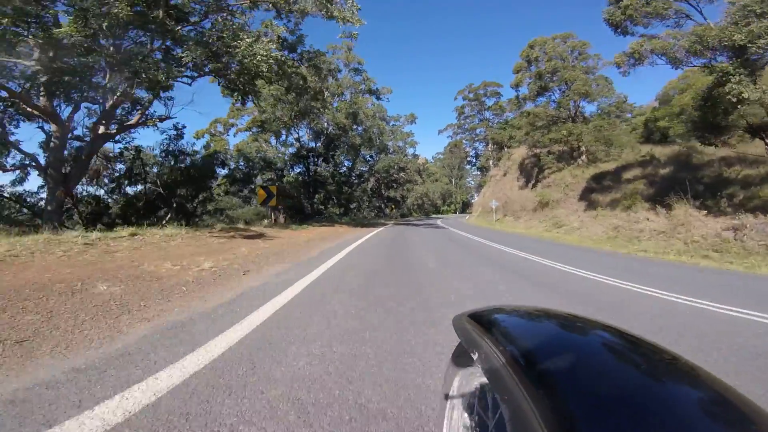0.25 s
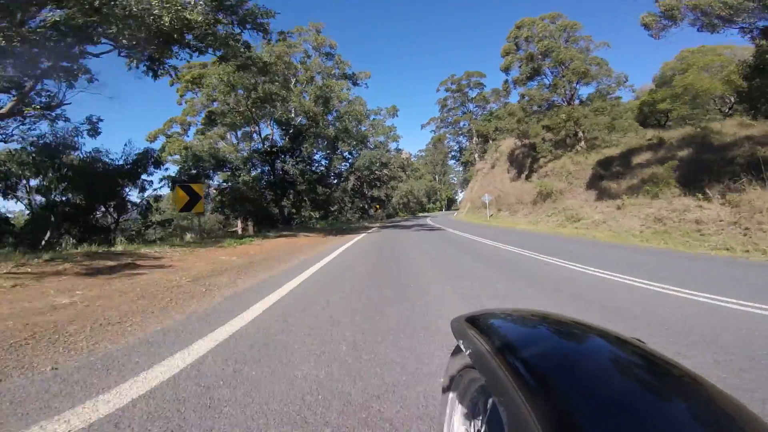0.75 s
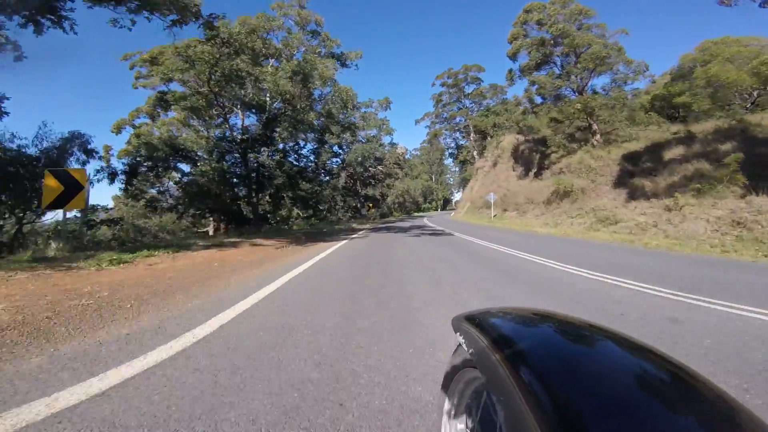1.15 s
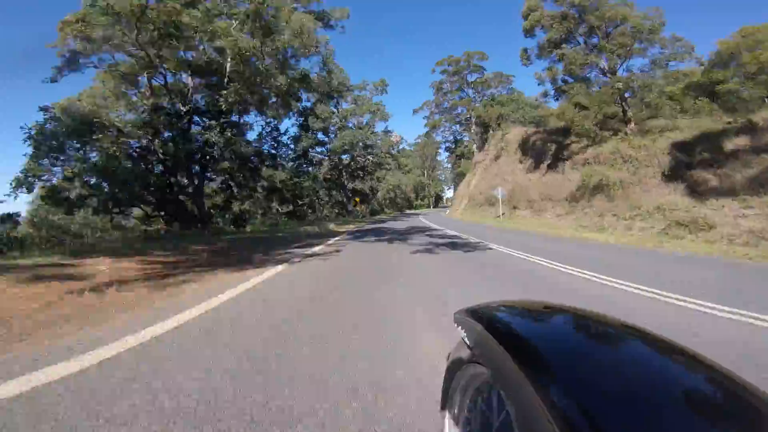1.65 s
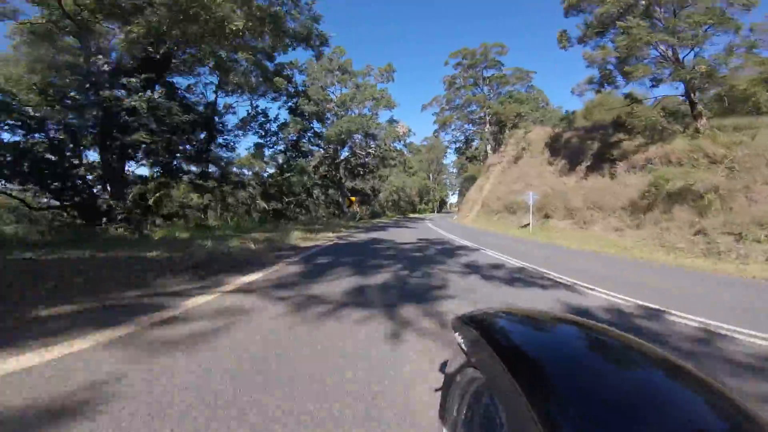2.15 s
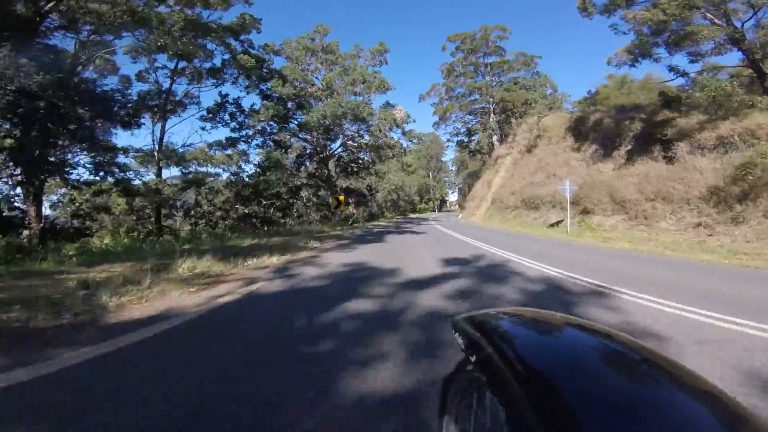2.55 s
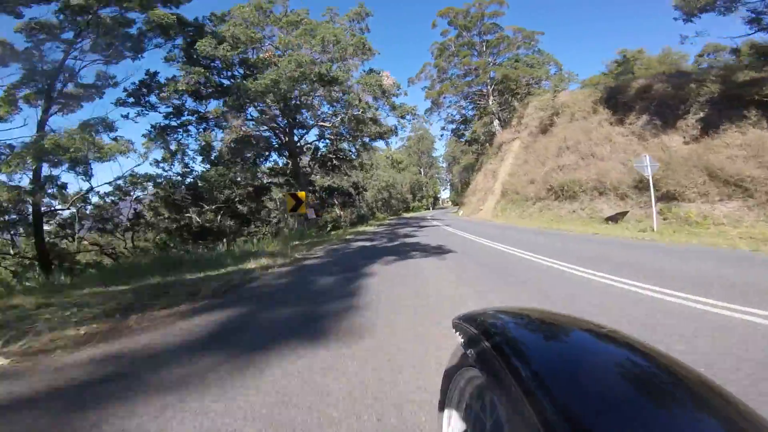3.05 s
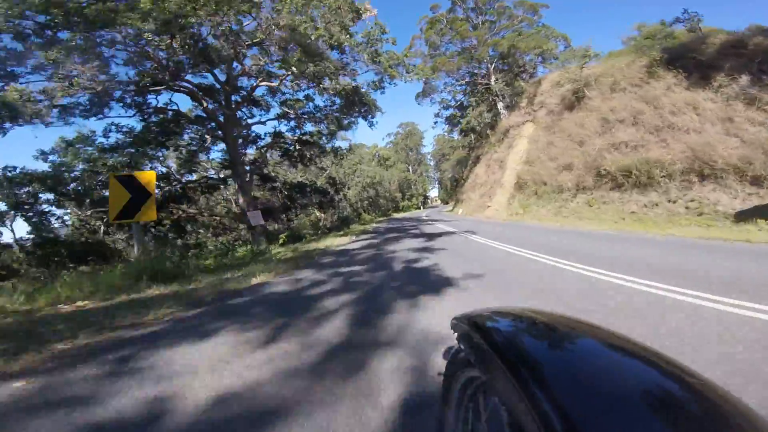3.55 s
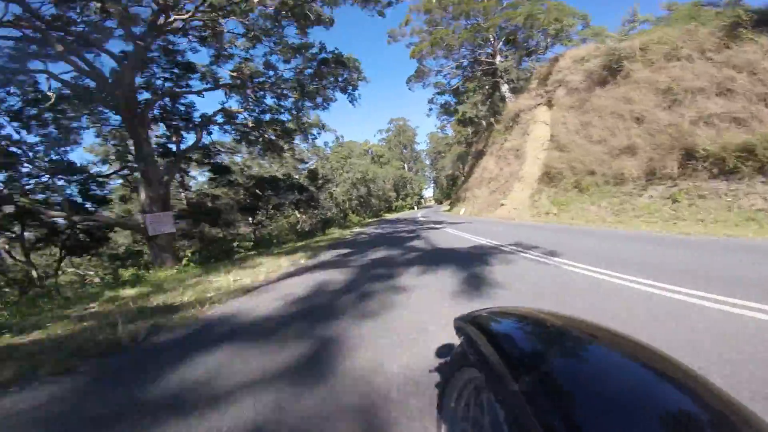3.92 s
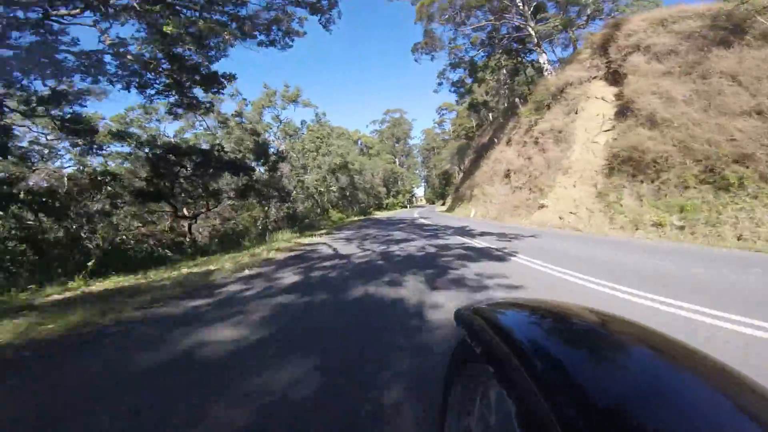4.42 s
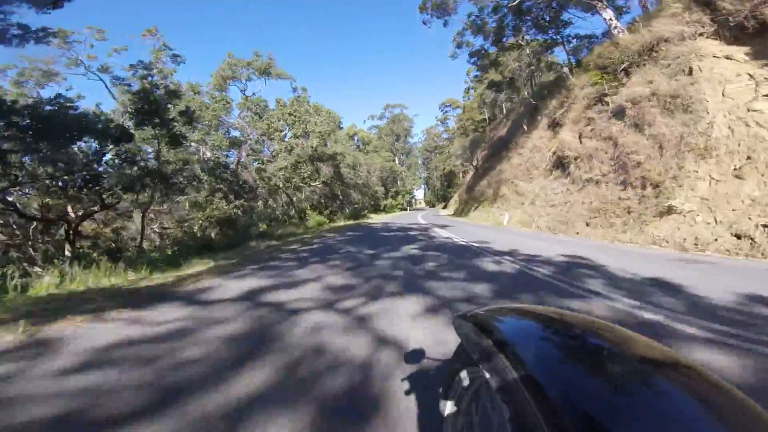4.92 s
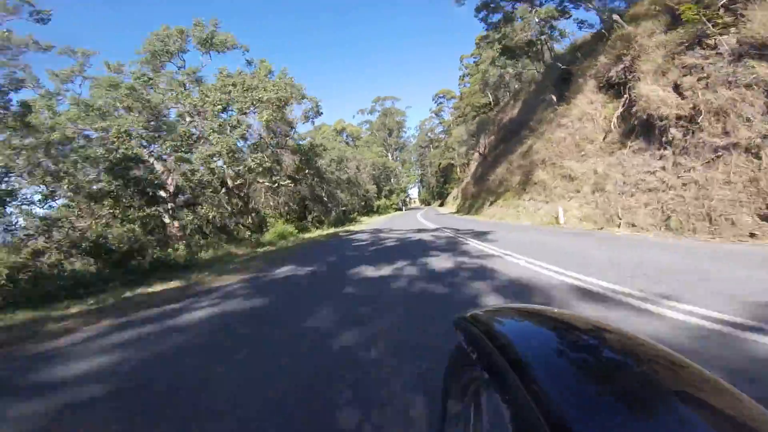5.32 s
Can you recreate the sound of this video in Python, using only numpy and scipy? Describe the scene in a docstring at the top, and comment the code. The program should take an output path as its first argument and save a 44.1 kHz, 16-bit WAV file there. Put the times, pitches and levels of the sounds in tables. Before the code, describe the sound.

A twin-cylinder motorcycle pulls hard with a booming, barking engine, shifts up twice with brief drops in pitch, rattling over low wind and tyre roar.

```python
"""Twin-cylinder motorcycle in three gears

A motorcycle pulls along a country road and changes gear twice, heard by a microphone fixed to its frame.
Exhaust and intake are sums of engine orders, sinusoids at multiples of the cycle rate: the exhaust booms
twice a cycle, the intake barks once. Gear teeth whine, the valve gear and chain hiss, and a loose part struck in
step with the boom excites resonances. Shaped noise gives tyre roar and wind buffeting."""
import sys
import numpy as np
from scipy import signal
from scipy.fft import rfft, irfft
from scipy.io import wavfile
from scipy.ndimage import uniform_filter1d

SR = 44100
rng = np.random.default_rng(int(sys.argv[2]) if len(sys.argv) > 2 else 0)


def generate_wav(signal):
    """Clip the signal to [-1, 1] and save it as 16-bit WAV at the path in sys.argv[1]."""
    frames = np.transpose(np.atleast_2d(signal))
    scaled = np.clip(frames, -1, 1) * 32767
    pcm = np.round(scaled).astype(np.int16)
    wavfile.write(sys.argv[1], SR, pcm)


N = 246078


def from_db(db):
    """Amplitude ratio of a level in decibels."""
    return 10 ** (np.asarray(db) / 20)


def rms_one(x):
    """Normalise the signal to unit effective value."""
    return x / np.sqrt(np.mean(x ** 2) + 1e-20)


def evened(x, seconds):
    """Divide a signal by its running effective value, which removes the slow envelope."""
    power = uniform_filter1d(x ** 2, int(seconds * SR))
    return x / np.sqrt(power + 1e-12)


def in_time(rows):
    """Linear interpolation of each column over the times in the first."""
    times_s, *columns = np.transpose(rows)
    t = np.arange(N) / SR
    return [np.interp(t, times_s, column) for column in columns]


def coloured_noise(spectrum):
    """Spectral shaping: white noise weighted in the frequency domain, effective value 1."""
    hz, db = np.transpose(spectrum)
    grid_hz = np.maximum(np.arange(N // 2 + 1) * SR / N, 1)
    weight_db = np.interp(np.log(grid_hz), np.log(hz), db, left=-80, right=-80)
    white = rng.standard_normal(N)
    return rms_one(irfft(rfft(white) * from_db(weight_db), N))


def drift(corner_hz):
    """Slow random fluctuation of spread 1: noise through two equal low-pass poles."""
    step = 40  # samples between computed points
    r = np.exp(-2 * np.pi * corner_hz * step / SR)
    noise = rng.standard_normal(N // step + 2002)
    slow = signal.lfilter([1], [1, -2 * r, r * r], noise)[2000:]  # drop the settling time
    return np.interp(np.arange(N) / step, np.arange(len(slow)), rms_one(slow))


def resonate(x, modes):
    """Modal superposition: parallel two-pole resonances with alternating signs."""
    out = 0
    for k, (hz, width_hz, db) in enumerate(modes):
        r = np.exp(-np.pi * width_hz / SR)
        w = 2 * np.pi * hz / SR
        zeros = [(1 - r * r) / 2, 0, (r * r - 1) / 2]
        poles = [1, -2 * r * np.cos(w), r * r]
        out = out + (-1) ** k * from_db(db) * signal.lfilter(zeros, poles, x + 1e-18)
    return out


def passes(turns):
    """Phase crossings: samples at which the count of turns passes a whole number."""
    return np.flatnonzero(np.diff(np.floor(turns)) > 0)


def wind():
    """Flow noise: low-frequency pressure noise at the microphone port, with a fluctuating level."""
    # Gusts. Each row: time in seconds, relative level in dB.
    gusts = [(0, -24.5), (.3, -27.5), (.7, -36), (1.5, -32.5), (1.9, -37.5), (2.9, -31), (3.6, -30),
             (4.4, -32), (5.13, -27.5), (5.5, -29)]
    # Spectrum of the buffeting. Each row: frequency in Hz, relative density in dB per Hz.
    buffet = [(15, -10.5), (35, -7), (70, -10), (150, -16.5), (300, -16), (600, -23.5)]
    gust_db, = in_time(gusts)
    return from_db(gust_db + 3.5 + 2.07 * drift(5.2)) * coloured_noise(buffet)


def road():
    """Tyre-road noise: rolling on coarse asphalt radiates a broad band of low-frequency noise."""
    # Spectrum of the roar. Each row: frequency in Hz, relative density in dB per Hz.
    roar = [(50, -12), (90, -3), (150, 0), (250, -3), (450, -10), (800, -24)]
    roar_db = -40
    return from_db(roar_db + 0.5 * drift(5.4)) * coloured_noise(roar)


def shifts():
    """Impact excitation: the gear lever drops into place as a dull clack with a short grind after it."""
    # Gear changes. Each row: time in seconds, strength of the impact in dB.
    changes = [(1.686, -35), (4.473, -32)]
    # Resonances of the gearbox. Each row: frequency in Hz, bandwidth in Hz, gain in dB.
    gearbox = [(1200, 90, 15), (2000, 260, 20), (700, 120, 8)]
    decay_s = 0.0034
    clacks = np.zeros(N)
    for s, db in changes:
        clacks[round(s * SR)] = from_db(db)
    envelope = signal.lfilter([1], [1, -np.exp(-1 / (decay_s * SR))], clacks + 1e-18)
    ringing = resonate(envelope * rng.standard_normal(N), gearbox)
    return signal.sosfilt(signal.butter(2, 2500, fs=SR, output="sos"), ringing)


def rattle(cycles, per_s, boom_db):
    """Impact chatter: a loose part, shaken by the boom, strikes and rebounds into housing and mount."""
    # Loudest knocks. Each row: time in seconds, strength of the impact in dB.
    knocks = [(0.776, -28), (0.8724, -29.5), (0.896, -29), (0.9196, -25.5), (0.9667, -28), (0.9898, -26.5),
              (1.035, -26), (1.058, -24), (1.081, -29), (1.1029, -24), (1.1492, -22), (1.2146, -24),
              (1.2486, -25), (1.2595, -21.5), (1.3244, -20.5), (1.3557, -24), (1.3888, -17),
              (1.4486, -23.5), (1.479, -19), (1.5514, -22.5), (1.6357, -25), (2.9478, -24), (3.442, -28),
              (3.4648, -23), (3.6541, -28), (3.819, -21), (3.839, -23), (3.8711, -20), (3.9032, -21.5),
              (3.936, -34), (3.9551, -22), (4.0688, -23.5), (4.1002, -20.5), (4.121, -19), (4.1411, -20),
              (4.251, -25), (4.27, -22), (4.311, -25.5), (4.352, -23), (5.3961, -44)]
    # Resonances of the microphone's housing. Each row: frequency in Hz, bandwidth in Hz, gain in dB.
    housing = [(3080, 900, -1.5), (4700, 700, 9), (5470, 270, 6.5), (6465, 180, 6.5), (7730, 690, 1)]
    # Duller resonances of the mount. Each row: frequency in Hz, bandwidth in Hz, gain in dB.
    mount = [(1100, 465, 14.5), (1870, 350, 18.5), (2490, 1100, 10.5)]
    # Rattle in each gear. Each row: base strength of light knocks in dB, dull part of light knocks
    # in dB, dull part of hard knocks in dB, gain of the top of the ring in dB.
    by_gear = [(-27.5, -4, -11.5, 1), (-28, -5, -5, -5.5), (-57, 1, -6, -2)]
    # Start of each gear in seconds.
    gear_from_s = [0, 1.9, 4.7]
    full_boom_db, rattle_follows = -9.5, 0.68  # the second in dB per dB of boom
    lifts_at_per_s, seated_loss_db = 44.25, 8.5  # below this cycle rate the part mostly stays seated
    spread_db, decay_s, top_hz = 2.5, 0.0016, 6300

    gear = np.searchsorted(gear_from_s, np.arange(N) / SR, "right") - 1
    light_db, light_dull_db, hard_dull_db, top_db = np.array(by_gear)[gear].T
    rattle_db = light_db + rattle_follows * (boom_db - full_boom_db)
    rattle_db = rattle_db - seated_loss_db * (per_s < lifts_at_per_s)

    bright = np.zeros(N)
    # a strike in each trough of the boom, a weaker rebound as the boom rises
    for phase_turns, db in ((.5, 3.0), (0.22, -8.0)):
        at = passes(2 * cycles + phase_turns)
        luck = np.minimum(rng.standard_normal(700)[:len(at)], 1.6)
        bright[at] = from_db(rattle_db[at] + db + spread_db * luck)
    dull = bright * from_db(light_dull_db)
    for s, db in knocks:
        i = round(s * SR)
        # a hard knock takes the place of the light ones near it
        bright[i - 130:i + 130] = 0
        dull[i - 130:i + 130] = 0
        bright[i] = from_db(db)
        dull[i] = from_db(db + hard_dull_db[i])

    out = 0
    for strikes, modes in ((bright, housing), (dull, mount)):
        chatter = signal.lfilter([1], [1, -np.exp(-1 / (decay_s * SR))], strikes + 1e-18)
        jolts = rng.choice([-1, 1], N) * rng.uniform(.3, 1, N)
        touch = chatter * jolts + 4 * strikes
        out = out + resonate(touch, modes)
    below = signal.sosfilt(signal.butter(2, top_hz, fs=SR, output="sos"), out)
    out = below + from_db(top_db) * (out - below)
    return signal.sosfilt(signal.butter(4, 8700, fs=SR, output="sos"), out)


def gears(cycles):
    """Tooth-mesh tones: loaded gears sing faintly at the rate at which their teeth meet."""
    # Whines. Each row: teeth per engine cycle, start in seconds, end in seconds, mean peak level in dB.
    whines = [(35, 0, 1.05, -49), (43, .6, 1.15, -48), (49, .1, .7, -49), (52, 1.8, 2.3, -56),
              (43.5, 2.5, 3.15, -50), (53, 2.6, 3.3, -55), (44, 5.0, 5.7, -51), (23.5, 5.0, 5.7, -48)]
    t, out = np.arange(N) / SR, 0
    for teeth, start, end, db in whines:
        loaded = np.clip(np.minimum(t - start, end - t) / .15, 0, 1)  # fades over 0.15 s
        phase = 2 * np.pi * teeth * cycles + drift(6)
        out = out + loaded * from_db(db + 3 * drift(8)) * np.sin(phase)
    return out


def machinery(cycles, hiss_db):
    """Amplitude-modulated noise: valve gear and chain hiss and fizz, throbbing with each firing."""
    # Spectrum of the hiss. Each row: frequency in Hz, relative density in dB per Hz.
    hiss = [(450, 5), (600, -5), (850, -12), (1250, -17), (1450, -22), (1750, -17), (2300, -21),
            (2950, -27), (3400, -27.5), (4100, -33), (4750, -34.5), (5400, -39.5), (5900, -58.5),
            (6550, -40), (7200, -48.5), (9000, -60)]
    # Spectrum of the brighter fizz. Each row: frequency in Hz, relative density in dB per Hz.
    fizz = [(880, -41.5), (1500, -8.5), (1730, -9), (1930, -3.5), (2070, -2), (3340, -16.5), (4210, -18),
            (4780, -7.5), (5810, -16.5), (6400, -7), (6950, -13.5), (7830, -18.5), (8960, -25.5),
            (11600, -42), (19700, -120)]
    # Course of the fizz, strongest in low gear. Each row: time in seconds, level in dB.
    fizz_course = [(0, -41), (.6, -39), (.7, -43.5), (1.6, -46.5), (1.75, -57.5), (3.4, -50.5),
                   (4.4, -60.5), (4.6, -71), (5.58, -77.5)]
    throb_db = 0.88 * np.cos(4 * np.pi * cycles + 5.1) + 1.1 * drift(25)
    fizz_db, = in_time(fizz_course)
    hissing = from_db(hiss_db + throb_db) * coloured_noise(hiss)
    return hissing + from_db(fizz_db + throb_db) * coloured_noise(fizz)


def intake(cycles, per_s, bark_db):
    """Fourier synthesis of a pulse: orders in step make one gulp a cycle, with turbulence riding on it."""
    # Colour of the intake tract. Each row: frequency in Hz, relative level in dB.
    tract = [(200, -21), (250, -5.5), (290, -4), (330, -2.5), (352, 5), (378, -.5), (430, -1), (500, -8),
             (580, -15), (700, -14), (900, -30.5)]
    # Orders of the gulp. Each row: multiple of the cycle rate, level in dB added to the tract's colour.
    gulp_orders = [(1, 4), (6, 3.5), (7, 4.5), (8, 0), (9, -1), (10, 3.5), (11, -3), (12, 1), (13, -8),
                   (14, 3), (15, -3), (16, -8), (17, -3)]
    hz, db = np.transpose(tract)
    slip = .003 * drift(10)  # timing jitter in cycles
    smear = np.interp(per_s, [42, 46], [.03, .16])  # the burst smears out at high speed
    clean = 0
    for order, order_db in gulp_orders:
        colour_db = np.interp(np.log(order * per_s), np.log(hz), db)
        spread = 2.77 + smear * (order - 9) ** 2 + .38 * drift(2.5)  # phase in radians
        strength = from_db(colour_db + order_db + 1.65 * drift(1.7))
        clean = clean + strength * np.cos(2 * np.pi * order * (cycles + slip) + spread)
    # each cycle gulps a little more or less than the last
    gulp_db = 2.2 * rng.standard_normal(400)
    clean = evened(clean, .2) * from_db(np.interp(cycles, np.arange(400), gulp_db))
    turbulent = coloured_noise(tract) * from_db(1.9 * np.cos(2 * np.pi * cycles))
    # throttle closed, taken from falling speed: the gulps break up into burble
    shut = uniform_filter1d(1. * (np.gradient(per_s) < 0), SR // 8)
    mixed = from_db(-.6 * shut) * clean + from_db(-11.5 + 3 * shut) * turbulent
    return from_db(bark_db) * mixed


def through_pipe(hz):
    """Acoustic transfer: the exhaust pipe passes some pitches and swallows others; returns dB."""
    # Response of the pipe. Each row: frequency in Hz, level in dB at full load.
    pipe = [(64, -21.5), (72, -23), (77, -32.5), (81, -20.5), (86.5, -21), (89, -16), (92, -11.5),
            (100, -14.5), (130, -32), (150, -30), (165, -20.5), (183, -20.5), (200, -19)]
    return np.interp(hz, *np.transpose(pipe))


def exhaust(cycles, per_s, load_db, boom_db):
    """Engine orders: firing pulses give near-sinusoidal low orders whose levels waver a little."""
    # Odd orders from uneven firing, fading as speed rises. Each row: order, level in dB at the
    # reference speed and full load, loss in dB per cycle/s, least level in dB, phase in radians.
    lope = [(3, -23, 2.2, -47, 1.0), (5, -21, 1.5, -44, 1.2)]
    reference_per_s = 32
    second_follows, lope_follows = 0.54, 1.87  # dB per dB of load
    second_db = through_pipe(4 * per_s) + second_follows * load_db - 4.5
    out = from_db(boom_db + 1.4 * drift(7.4)) * np.cos(4 * np.pi * cycles)
    out = out + from_db(second_db + 1.3 * drift(5.0)) * np.cos(8 * np.pi * cycles - 1.3)
    for order, db, loss_db, least_db, phase in lope:
        odd_db = db - loss_db * (per_s - reference_per_s) + lope_follows * load_db
        odd_db = np.maximum(odd_db, least_db)
        out = out + from_db(odd_db + 1.6 * drift(6)) * np.cos(2 * np.pi * order * cycles + phase)
    return np.sqrt(2) * out  # the levels are effective values


def scene():
    """Linear superposition: all sources add at one microphone, the engine parts sharing speed and load."""
    # Engine speed. Each row: time in seconds, engine cycles per second.
    speed = [(0.0, 32.03), (0.23, 33.88), (0.78, 40.79), (1.25, 46.35), (1.5, 49.83), (1.63, 44.78),
             (1.74, 40.82), (1.86, 37.46), (2.04, 32.55), (2.3, 35.3), (2.69, 38.67), (3.0, 40.73),
             (3.3, 43.5), (3.9, 47.42), (4.25, 50.69), (4.42, 44.74), (4.63, 39.33), (4.85, 38.11),
             (5.58, 40.94)]
    # Engine load. Each row: time in seconds, level in dB relative to full pull.
    load = [(0, -5.5), (.08, 0.5), (.55, 0), (.95, -1.5), (1.2, -1), (1.6, -3.5), (1.68, -9), (1.84, -12),
            (2.05, -8), (2.6, -2.5), (2.8, -1), (3.25, -2), (3.7, -1.5), (4.27, -1), (4.4, -8),
            (4.63, -10.5), (4.9, -6.5), (5.25, -4), (5.58, -3.5)]
    boom_follows, bark_follows, hiss_follows = 0.93, 1.03, 0.74  # dB per dB of load
    bark_db, hiss_db = -19.5, -31  # at full pull
    overrun_db, overrun_fades_per_s, overrun_loss_db = -25.5, 39.1, 6  # the last in dB per cycle/s

    per_s, = in_time(speed)
    load_db, = in_time(load)
    cycles = np.cumsum(per_s) / SR + .06
    boom_db = through_pipe(2 * per_s) + boom_follows * load_db
    # with the throttle shut the boom holds, then fades as the engine slows
    coasting_db = overrun_db - overrun_loss_db * np.maximum(overrun_fades_per_s - per_s, 0)
    coasting_db = coasting_db - 30 * (np.gradient(per_s) > 0)
    boom_db = np.maximum(boom_db, uniform_filter1d(coasting_db, SR // 20))

    engine = exhaust(cycles, per_s, load_db, boom_db)
    engine = engine + intake(cycles, per_s, bark_db + bark_follows * load_db)
    clatter = machinery(cycles, hiss_db + hiss_follows * load_db)
    clatter = clatter + rattle(cycles, per_s, boom_db) + shifts()
    return (engine + gears(cycles) + clatter + road() + wind())[None]


def record(dry):
    """Saturation and band-limiting: peaks are rounded, the treble droops and is cut."""
    soft = 0.72 * np.tanh(dry / 0.69)
    soft = signal.sosfilt(signal.butter(2, 10500, fs=SR, output="sos"), soft)
    cutoff_hz = 13000  # 70 dB down from here up
    return signal.sosfilt(signal.cheby2(12, 70, cutoff_hz, fs=SR, output="sos"), soft)


dry = scene()
out = record(dry)
generate_wav(out)
```